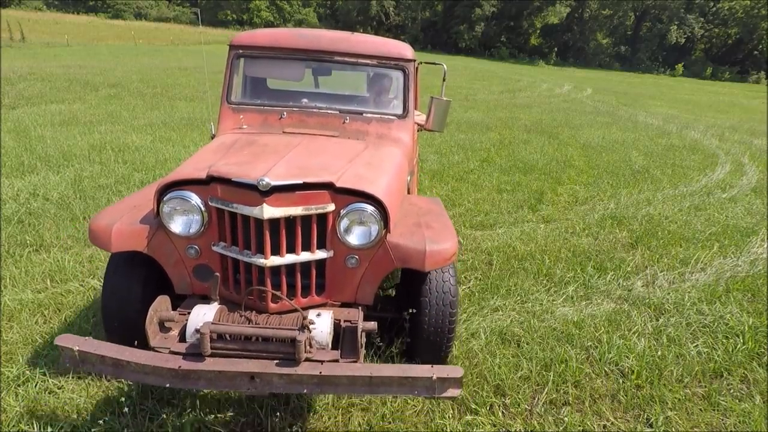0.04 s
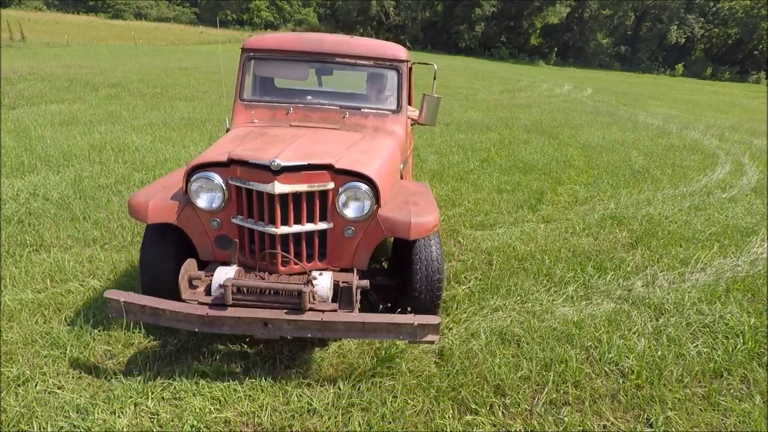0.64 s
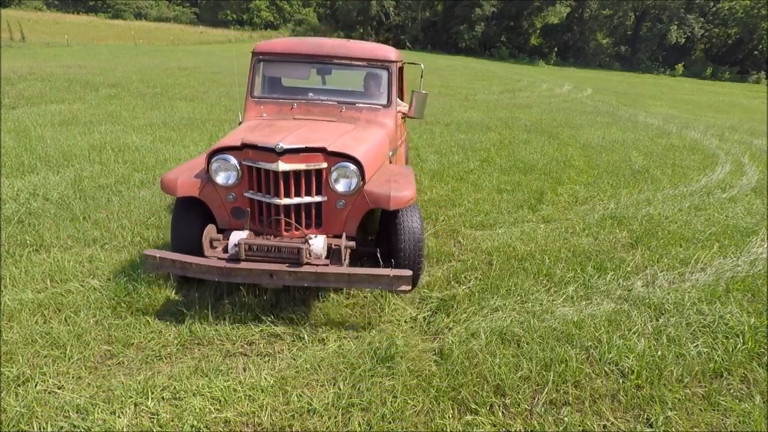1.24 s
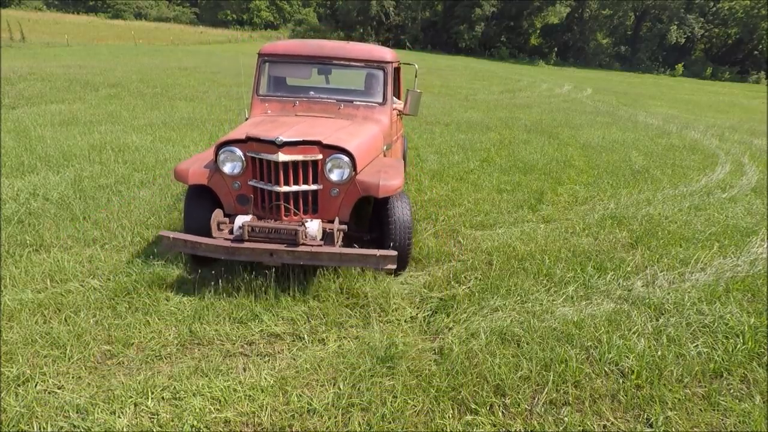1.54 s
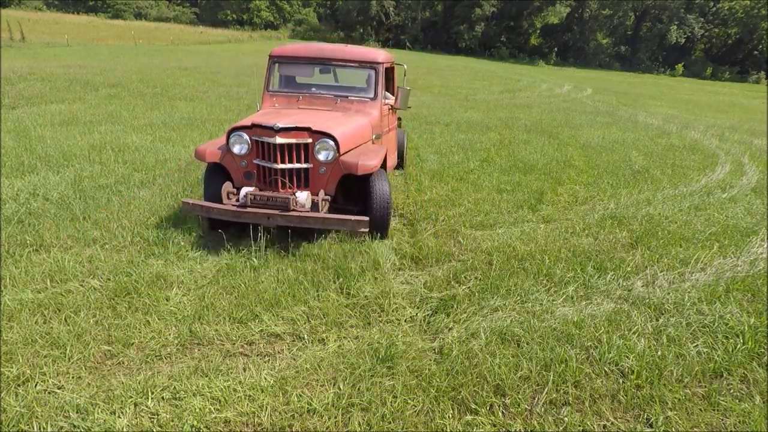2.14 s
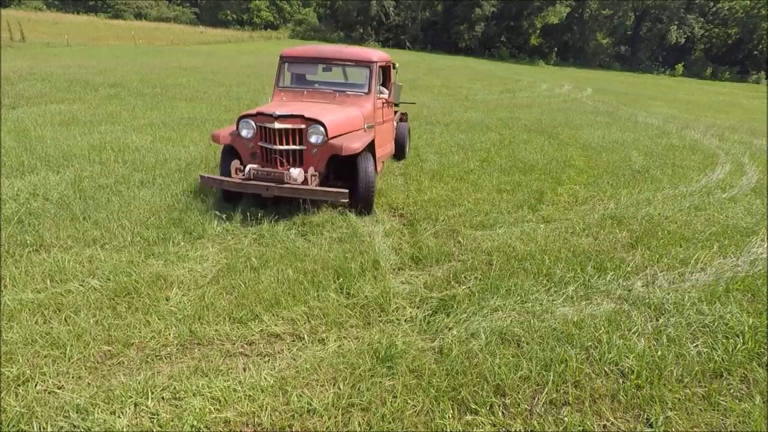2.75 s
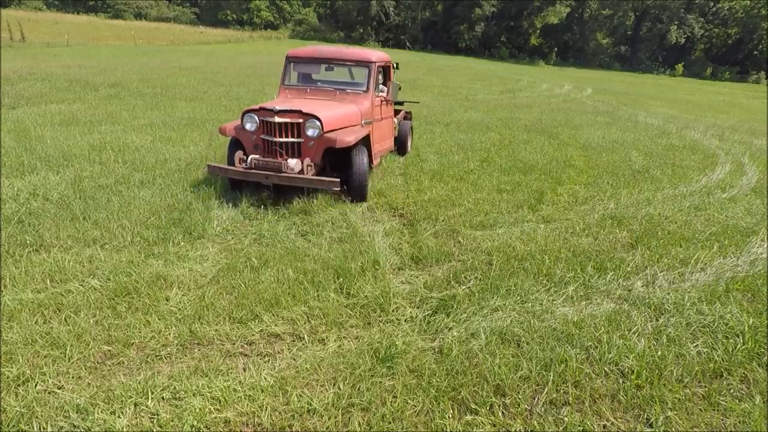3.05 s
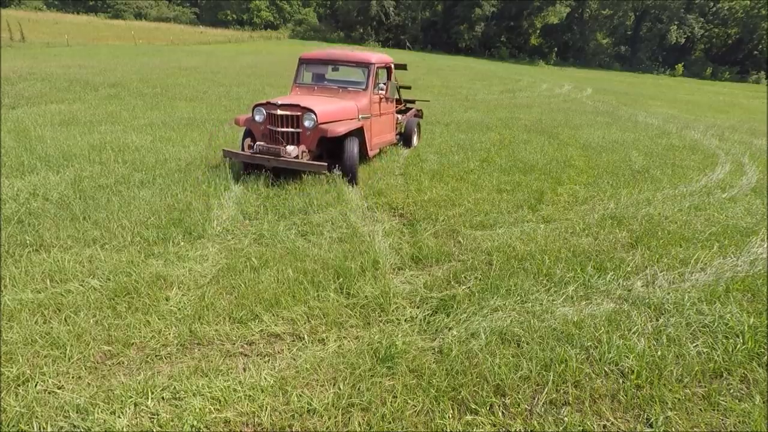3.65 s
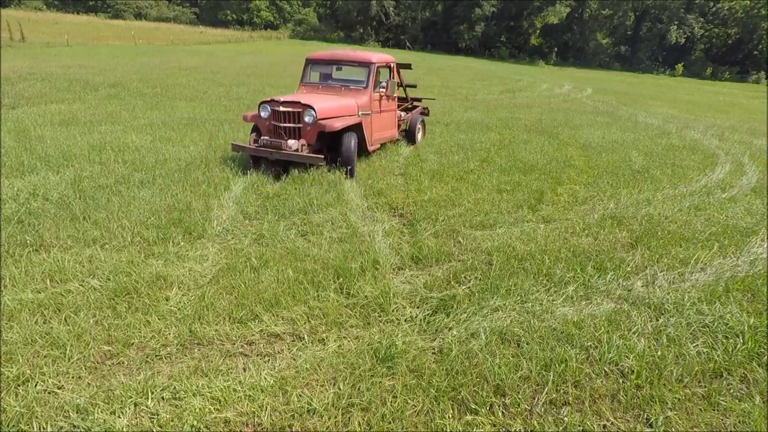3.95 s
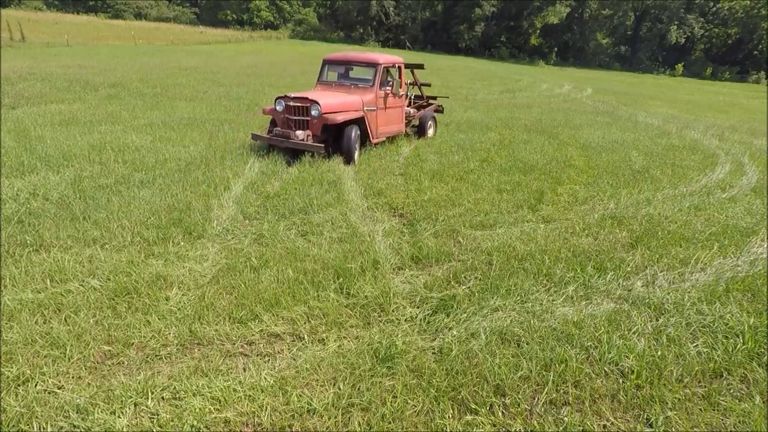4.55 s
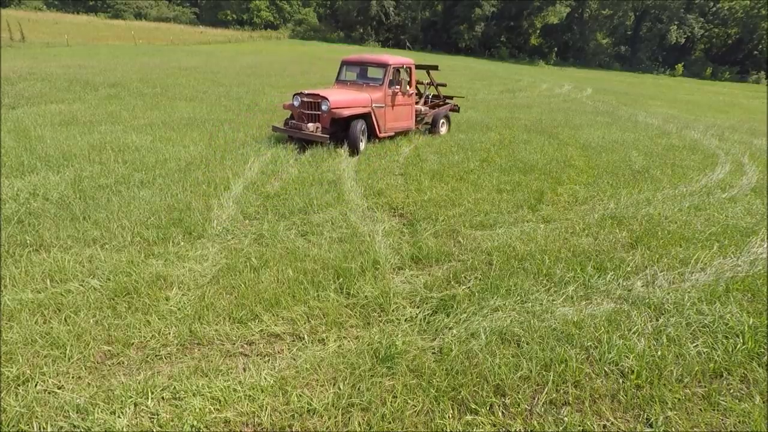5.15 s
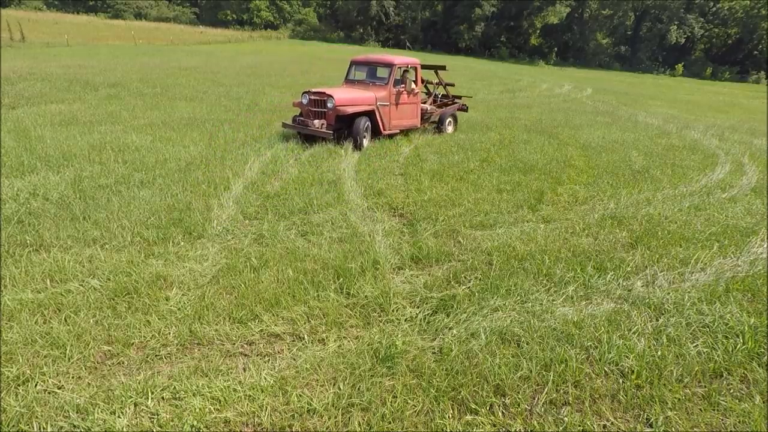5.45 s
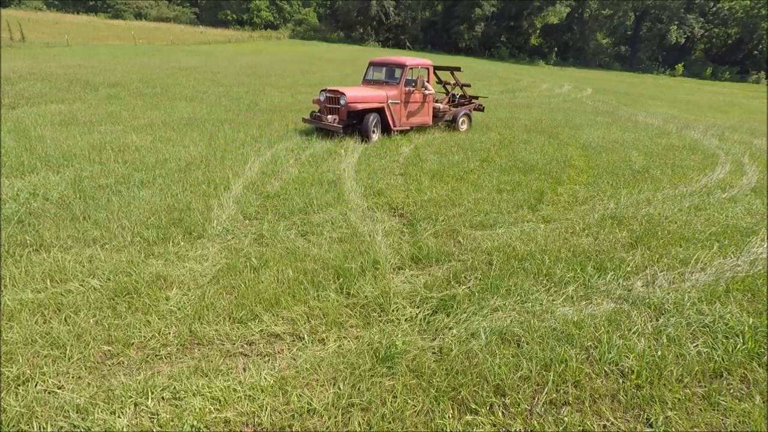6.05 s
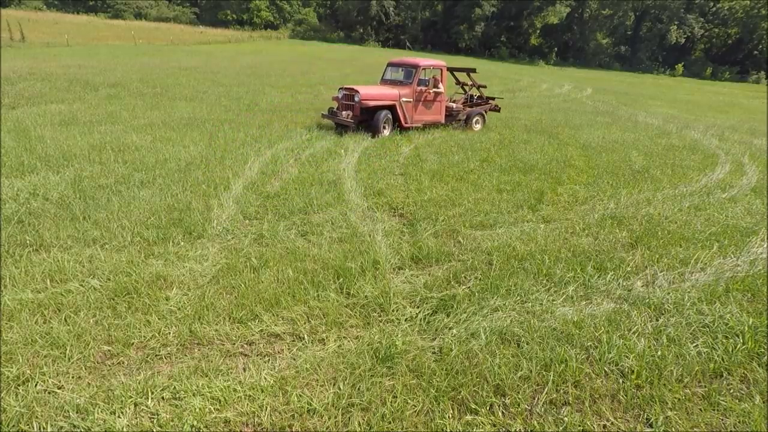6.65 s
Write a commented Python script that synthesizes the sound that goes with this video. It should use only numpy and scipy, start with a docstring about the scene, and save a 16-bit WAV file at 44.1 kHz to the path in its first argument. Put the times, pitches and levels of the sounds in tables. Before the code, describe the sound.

An old six-cylinder pickup throbs close by in an open field, with a deep exhaust boom, a rough bark, an intake honk and pulsing fan rush and valve clatter. It reverses slowly away from a fixed stereo microphone. The bark and honk die off and the clatter softens, while the boom stays strong and creeps up in pitch. Loose steel clinks now and then, and a faint, thin gear whine comes near the end.

```python
"""First comes the boom of an old six-cylinder pickup five metres off, throbbing once a crank turn.
It backs away over a mown field to about 13 metres and turns side on, its engine slowly gaining speed.
Close to the microphones the engine bay adds a rough bark and an intake honk. Fan rush and valve
clatter pulse with the crank and fade with distance; loose steel clinks, and a faint gear whine comes late.
A limiter on the stereo pair holds the loudest throbs level."""
import sys
import numpy as np
from scipy import signal
from scipy.fft import rfft, irfft, next_fast_len
from scipy.io import wavfile
from scipy.ndimage import uniform_filter1d, minimum_filter1d, map_coordinates

SR = 44100
rng = np.random.default_rng(int(sys.argv[2]) if len(sys.argv) > 2 else 0)


def output_pcm(signal):
    """Save a mono or channel-first signal as 16-bit PCM at the path in sys.argv[1].

    Samples are clipped to [-1, 1] before scaling.
    """
    pcm = np.clip(np.atleast_2d(signal).T, -1, 1) * 32767
    wavfile.write(sys.argv[1], SR, np.round(pcm).astype(np.int16))


N = 303849

# Engine speed. Each row: time in seconds, crank turns a minute.
CRANK_RPM = [(0.0, 1070.9), (0.6, 1075.3), (1.25, 1114.6), (1.75, 1092.6), (2.8, 1160.7), (3.6, 1173.1),
             (4.2, 1203.0), (4.9, 1211.0), (5.65, 1198.5), (6.9, 1218.9)]
# The way over the field. Each row: time in seconds, distance in metres, heading in degrees.
TRUCK_PATH = [(0, 5.3, 2), (.6, 5.44, 0.5), (2.4, 8.35, 10.5), (3.6, 9.96, 23.5), (5.7, 13.1, 48.5),
              (6.89, 12.7, 50.5)]
# Engine tones; unequal cylinders add the half orders of the bark and airbox.
# Each row: order in cycles per crank turn, relative level in dB.
EXHAUST_ORDERS = [(3.0, -36.5), (4.0, -45), (5.0, -37.5), (6.0, -22.0), (7.0, -40), (8.0, -26.5),
                  (9.0, -15.5), (10.0, -13.5), (11.0, -39.5), (12.0, -32), (13.0, -35), (14.0, -41.5),
                  (15.0, -39)]
BARK_ORDERS = [(11.5, -47.5), (12.0, -34), (12.5, -34.5), (13.0, -20), (13.5, -34), (14.0, -29.5),
               (14.5, -46), (15.0, -36.5), (15.5, -30.5), (16.0, -25.5), (16.5, -34), (17.0, -26.5),
               (17.5, -39.5), (18.0, -45), (18.5, -38), (19.0, -27.5), (19.5, -37), (20.0, -39),
               (20.5, -45.5)]
AIRBOX_ORDERS = [(21.0, -40.5), (21.5, -45.5), (22.0, -52), (22.5, -40), (23.0, -38), (23.5, -44),
                 (24.0, -36), (24.5, -44), (25.0, -36), (25.5, -42), (26.0, -36.5), (26.5, -49)]
# Resonances. Each row: centre in Hz, width in Hz, relative level in dB.
TAILPIPE_MODES = [(104.4, 25.3, -6), (153.3, 32.6, -6.5), (191.9, 21.5, 4.5), (286, 55, -10),
                  (321, 35, -13)]
INTAKE_MODES = [(565.4, 30, 3), (743, 120, -13)]
STEEL_MODES = [(1213, 18, -2), (1587, 40, -3), (1830, 14, -4), (2404, 30, -3.5), (2866, 59, -3.5),
               (3133, 51, -2.5), (3448, 58, 0), (3734, 11, 3.5), (3960, 20, -16), (4540, 25, -7.5),
               (5250, 54, -2.5), (5496, 80, -2.5), (6520, 80, -10), (7360, 57, -7), (7660, 22, -3)]
# Noise colours. Each row: frequency in Hz, relative spectral level in dB.
RASP_SPECTRUM = [(120, -37), (200, -8.5), (280, -7.5), (360, 2), (400, -14.5), (460, 1.5), (560, -16),
                 (800, -34.5), (1500, -74)]
FAN_SPECTRUM = [(200, -10), (450, -7.5), (700, 1.5), (900, 0), (1200, -2), (1600, -3.5), (2100, -7.5),
                (3000, -19), (6000, -35)]
CLATTER_SPECTRUM = [(1180, -43.5), (2000, -14.5), (2540, -4.5), (2810, -2.5), (3660, -0.5), (3980, -3),
                    (4360, -0.5), (5060, -5.5), (5500, -5.5), (5920, -2), (7410, -5), (8250, -17),
                    (9350, -14.5), (13700, -40.5), (14500, -37)]
RUMBLE_SPECTRUM = [(15, -8), (30, 0.5), (80, 4), (150, -7), (500, -22.5), (2000, -36.5), (7000, -35.5),
                   (14000, -63.5)]
# A loose panel singing. Each row: time of the peak in seconds, level there in dB.
PANEL_SQUEAKS = [(.62, -42.5), (1.02, -41.5), (1.35, -46)]
# Loose body parts. Each row: start in seconds, relative level in dB.
BODY_CLINKS = [(0.2163, -28.5), (0.4994, -25.5), (1.8502, -30), (2.1836, -25.5), (2.4994, -22.5),
               (2.901, -25), (3.2194, -34), (3.6306, -27.5), (4.2998, -36), (4.3839, -25), (5.38, -26),
               (5.878, -27)]
# How alike the two microphones hear. Each row: frequency in Hz, correlation (capped at 1 in use).
MIC_LIKENESS = [(60, 3), (500, 0.24), (1000, 0.5), (2000, 0.54), (4000, 1.08), (8000, 0.13), (14000, .5)]
# Their difference in colour. Each row: frequency in Hz, left minus right in dB.
MIC_BALANCE = [(60, 7.5), (91, 1), (140, 3), (210, 3.5), (320, 4.0), (490, 4.5), (750, 7), (1140, -6),
               (1740, 7.5), (2650, -3), (4040, 1.5), (6160, 5.5), (9390, -8.5), (14300, 2)]

SIDE_ON_DEG, SHADE_STEEPNESS = 50.7, 2.54  # where the wing shades the engine bay, and how abruptly
PIPE_HZ, PIPE_WIDTH_HZ = 200.9, 18.2  # the tailpipe resonance that the tenth order climbs into
NINTH_DB_PER_RPM = 0.01
GAP_DEG, GAP_HALF_WIDTH_DEG, GAP_DB = 27, 14, 6.5  # where the bonnet gap faces the microphones
WHINE_FROM_S, WHINE_TO_S, WHINE_DB = 5.15, 6.3, -52.5
WHINE_FADE_DB_PER_S, SQUEAK_FADE_DB_PER_S = 13.5, 74.5


def exhaust(turns):
    """The tailpipe booms over its burble; the ninth and tenth orders grow as the engine speeds up."""
    rpm, = curves(CRANK_RPM)
    other_db = 4.2 + receding(fall_db=3, shade_db=1.0)
    ninth_db = NINTH_DB_PER_RPM * (rpm - rpm.max()) + 0.9
    detuning = 2 * (10 * rpm / 60 - PIPE_HZ) / PIPE_WIDTH_HZ
    tenth_db = .6 - 10 * np.log10(1 + detuning ** 2)
    rising_db = {9: ninth_db, 10: tenth_db}
    waves = puff(EXHAUST_ORDERS, turns, delay=-.188, smear=.018)
    boom = sum(amp(rising_db.get(round(order), other_db)) * wave
               for (order, _), wave in zip(EXHAUST_ORDERS, waves))
    return amp(-19.0 + 0.51 * tenth_db) * burble(turns) + boom * amp(0.54 * wobble(25))


def burble(turns):
    """Three firings a turn, never quite equal, ring the tailpipe; one cylinder in six is weak."""
    firings = beats(3 * turns)
    weak = np.arange(len(firings)) % 6 == 2
    kicks = np.zeros(N)
    kicks[firings] = 2 * rng.random(len(firings)) - 1 - 0.25 * weak
    pipe = ring(kicks, TAILPIPE_MODES)
    return unit(filtered(pipe, lambda hz: 1 / (1 + (hz / 380) ** 12) / (1 + (70 / (hz + 1)) ** 4)))


def engine_bark(turns):
    """A rasping bark beams through the grille and soon dies with distance; a little leaks underneath."""
    grille, leak = amp(-25.5 + receding(fall_db=26, near_m=5.45)), amp(-52.5)
    bark = unit(puff(BARK_ORDERS, turns.copy(), delay=.116, smear=.024).sum(0))
    return (grille + leak) * (amp(8.5) * bark * amp(0.52 * wobble(32)) + amp(-3.0) * rasp(turns))


def rasp(turns):
    """The noisy edge of the bark, swelling once a crank turn."""
    return unit(spread(white(), RASP_SPECTRUM) * amp(3.4 * throb(turns, .25)))


def airbox(turns):
    """The airbox rings above the bark, strongest every second turn, and carries only a short way."""
    tone = puff(AIRBOX_ORDERS, turns, delay=1.436, smear=-.064).sum(0)
    swell_db = 2 * throb(turns / 2, 0) + 2.8 * throb(turns, .07)
    return amp(-28.0 + receding(fall_db=25, near_m=6.1)) * unit(tone * amp(swell_db))


def intake_honk(turns):
    """Each gulp of air rings the intake; the honk is shaded as the nose swings off the microphones."""
    gulps = np.zeros(N)
    gulps[beats(turns - .55)] = 1
    air = unit(gulps) * amp(wobble(12)) + 1.33 * white()[0]
    honk = ring(air, INTAKE_MODES)
    honk = filtered(honk, lambda hz: 1 / (1 + (hz / 850) ** 8) / (1 + (480 / (hz + 1)) ** 12))
    level_db = -38.7 + receding(fall_db=-2.8, shade_db=20.2)
    return amp(level_db) * unit(honk * amp(1.8 * throb(turns, .8)))


def fan(surge):
    """Air rushes through the fan, surging with the crank."""
    rush = unit(spread(white(), FAN_SPECTRUM) * amp(1.3 * surge + 0.75 * wobble(120)))
    return amp(-40.0 + receding(fall_db=3.5, shade_db=2.5, near_m=5.9)) * rush


def valve_drive(turns, surge):
    """The force of the valve gear: six uneven taps a turn ride on the crank's surge."""
    valves = beats(6 * turns + .08 * wobble(150))
    taps = np.zeros(N)
    taps[valves] = rng.random(len(valves)) ** 2
    decay = amp(-60 * np.arange(SR // 20) / SR / 0.016)  # 60 dB down in 16 ms
    taps = unit(signal.fftconvolve(taps, decay)[:N])
    return (1 + 0.21 * taps) * amp(2.63 * surge)


def valve_clatter(drive, strokes):
    """Valve strokes clatter and ring the engine's steel, with a sizzle through the grille."""
    level_db = -37.7 + receding(fall_db=3.8, shade_db=3.4, near_m=6.3)
    # each mode swells as the truck rocks, and takes a different share of every blow
    steel = sum(ring(strokes, [mode]) * amp(1.6 * wobble(2.58) + 3.5 * wobble(24))
                for mode in STEEL_MODES)
    clatter = amp(-1.0) * spread(white() * drive, CLATTER_SPECTRUM) + amp(-4.5) * unit(steel)
    sizzle = spread(white(), [(3000, -27.0), (4400, 1.5), (5400, 1.5), (6500, -12.5), (8500, -36.0)])
    sizzle_db = -44.5 + 2.6 * (level_db - level_db.max())  # dies faster with distance
    return amp(level_db) * clatter + amp(sizzle_db) * sizzle


def bonnet_ticks(drive, surge):
    """The brightest ticks escape through a gap at the bonnet's side as it swings past."""
    _, heading = curves(TRUCK_PATH)
    level_db = -67.3 + GAP_DB / (1 + ((heading - GAP_DEG) / GAP_HALF_WIDTH_DEG) ** 4)
    ticks = white() * drive * amp(2.5 * surge)
    return amp(level_db) * spread(ticks, [(7000, -26), (9300, 2.0), (10500, -7.0), (14000, -26.5)])


def panel_squeaks(strokes):
    """A loose panel, shaken by the engine, sings briefly on one high note."""
    t = np.arange(N) / SR
    swells = sum(amp(db - SQUEAK_FADE_DB_PER_S * np.abs(t - peak)) for peak, db in PANEL_SQUEAKS)
    return swells * unit(ring(strokes, [(3805, 20, 0)]))


def body_clinks():
    """Loose steel clinks as the truck rolls over bumps, each blow dying in 30 ms."""
    t = np.arange(N) / SR
    blows = sum(amp(db - 17.5 - 60 * np.abs(t - start) / .03) * (t >= start) for start, db in BODY_CLINKS)
    return blows * spread(white(), [(1500, -18.0), (3500, 6.5), (6000, 0.5), (10000, -1.5), (14000, -12.5)])


def gear_whine(turns):
    """A thin, unsteady whine locked to the shaft, 51 cycles a turn: it swells, holds and fades."""
    t = np.arange(N) / SR
    level_db = WHINE_DB - WHINE_FADE_DB_PER_S * np.abs(t - np.clip(t, WHINE_FROM_S, WHINE_TO_S))
    flutter = amp(0.95 * wobble(30))
    return amp(level_db) * flutter * np.sqrt(2) * np.sin(2 * np.pi * 51 * turns + .9 * wobble(26))


def field_rumble():
    """A low rumble lies over the field and eases as the truck draws off."""
    return amp(np.linspace(-41, -44, N)) * spread(white(), RUMBLE_SPECTRUM)


def receding(fall_db, shade_db=0, near_m=5):
    """Level change in dB: fall_db lost per doubling of distance past near_m, shade_db more side on."""
    metres, heading = curves(TRUCK_PATH)
    doublings = np.log2(np.maximum(metres / near_m, 1))
    return -fall_db * doublings - shade_db * np.abs(heading / SIDE_ON_DEG) ** SHADE_STEEPNESS


def puff(table, turns, delay, smear):
    """Engine orders phased into a puff that rings out, delay turns late; smear draws it into a sweep."""
    order, db = np.transpose(table)
    order = np.round(2 * order) / 2
    shape_db = np.interp(np.arange(2049) / 32, np.r_[order[0] - 2, order, order[-1] + 2],
                         np.r_[-60, db, -60])
    cepstrum = irfft(np.log(amp(shape_db)))[:2048]
    minimum_phase = rfft(2 * cepstrum, 4096).imag[(order * 32).astype(int)]
    lag = delay * order + smear * (order - order[0]) ** 2
    phase = 2 * np.pi * (order[:, None] * turns - lag[:, None]) + minimum_phase[:, None]
    return np.sqrt(2) * amp(db)[:, None] * np.cos(phase)


def throb(turns, peak):
    """A cosine that crests once a turn, at the fraction peak."""
    return np.cos(2 * np.pi * (turns - peak))


def beats(phase):
    """Samples at which a phase passes whole numbers."""
    return np.flatnonzero(np.diff(np.floor(phase)) > 0)


def ring(x, modes):
    """x through a set of resonances of alternating sign."""
    return filtered(x, lambda f: sum((-1) ** k * amp(db) * 1j * f * width / (hz * hz - f * f + 1j * f * width)
                                     for k, (hz, width, db) in enumerate(modes)))


def spread(pair, spectrum):
    """Colour two unrelated signals and blend them into the left and right microphones, rms 1."""
    def response(hz):
        angle = np.arccos(np.clip(along(MIC_LIKENESS, hz), -1, 1)) / 2
        return amp(along(spectrum, hz)) * [np.cos(angle), np.sin(angle)]
    mid, side = filtered(pair, response)
    return unit(np.array([mid + side, mid - side]))


def filtered(x, response):
    """x times a complex response of frequency."""
    size = next_fast_len(N + SR // 2)
    return irfft(rfft(x, size) * response(np.fft.rfftfreq(size, 1 / SR)), size)[..., :N]


def along(points, hz):
    """Interpolate (Hz, value) points on a log axis."""
    knots, values = np.transpose(points)
    return np.interp(np.log(hz + 1), np.log(knots + 1), values)


def curves(rows):
    """One value per sample for each column after the time."""
    times, *columns = np.transpose(rows)
    return [np.interp(np.arange(N) / SR, times, column) for column in columns]


def wobble(rate):
    """A smooth random curve, rate knots a second."""
    return map_coordinates(rng.standard_normal(int(N * rate / SR) + 4), [np.arange(N) * rate / SR])


def white():
    """Two unrelated noises."""
    return rng.standard_normal((2, N))


def amp(db):
    """Decibels to gain."""
    return 10 ** (np.asarray(db) / 20)


def unit(x):
    """Scale to rms 1."""
    return x / np.sqrt(np.mean(x ** 2) + 1e-20)


def limiter(x, ceiling_db):
    """Turn both channels down just enough to hold the biggest throbs under a ceiling."""
    gain = np.minimum(1, amp(ceiling_db) / (np.abs(x).max(0) + 1e-9))
    return x * uniform_filter1d(minimum_filter1d(gain, size=SR // 70), size=SR // 70)


def scene():
    """The truck in the open, heard from one spot on the field; the crank times all its engine sounds."""
    turns = np.cumsum(curves(CRANK_RPM)[0]) / SR / 60 - .59
    truck = exhaust(turns)
    uneven_turns = turns + 0.0033 * wobble(30)
    truck = truck + engine_bark(uneven_turns) + airbox(uneven_turns) + intake_honk(turns)
    surge = throb(turns, .19)
    truck += fan(surge)
    drive = valve_drive(turns, surge)
    strokes = spread(white() * drive, [(1000, 0)])  # flat noise that shakes the steel and the panel
    truck += valve_clatter(drive, strokes) + bonnet_ticks(drive, surge) + panel_squeaks(strokes)
    return truck + gear_whine(turns) + body_clinks() + field_rumble()


def record(dry):
    """Two microphones of unlike colour feed a limiter; nothing is kept above 14.8 kHz."""
    heard = filtered(dry, lambda hz: amp(np.outer([.5, -.5], along(MIC_BALANCE, hz))))
    return filtered(limiter(heard, ceiling_db=-3.0), lambda hz: hz < 14800)


dry = scene()
out = record(dry)
output_pcm(out)
```